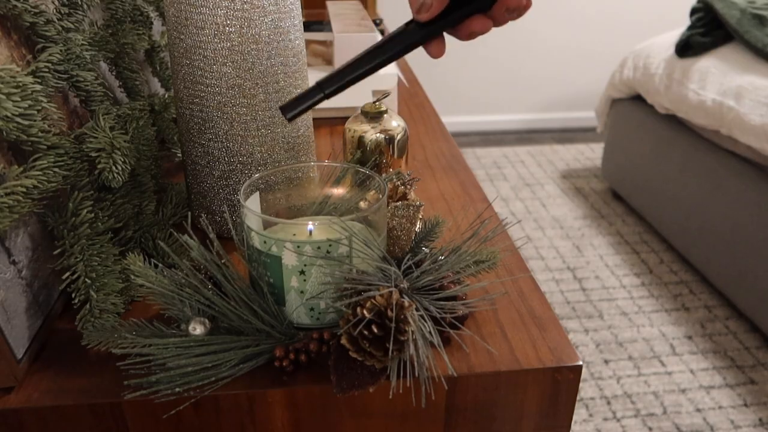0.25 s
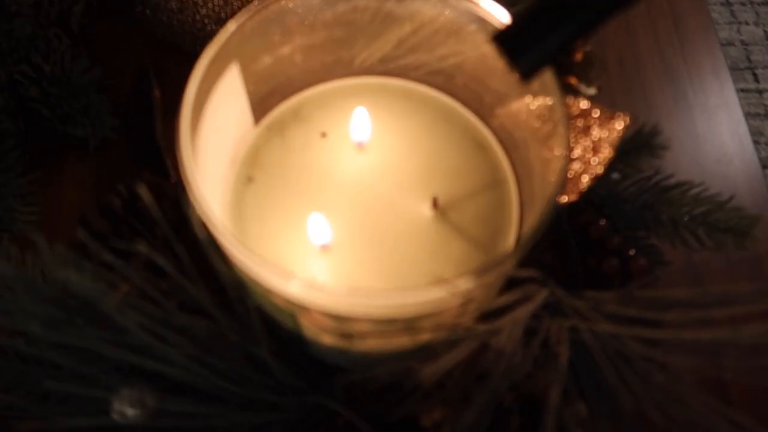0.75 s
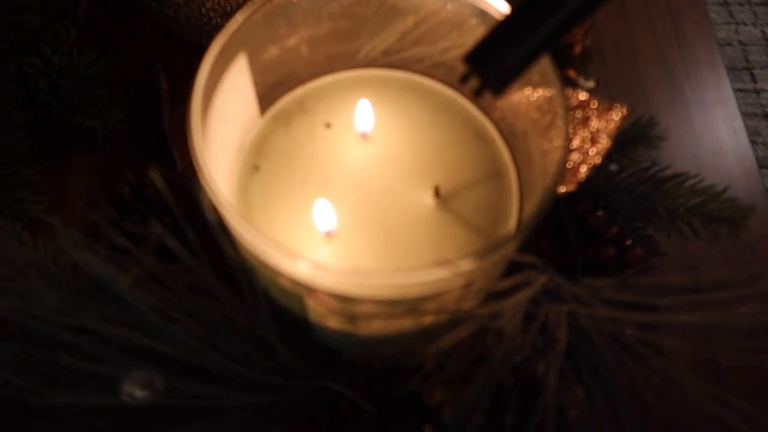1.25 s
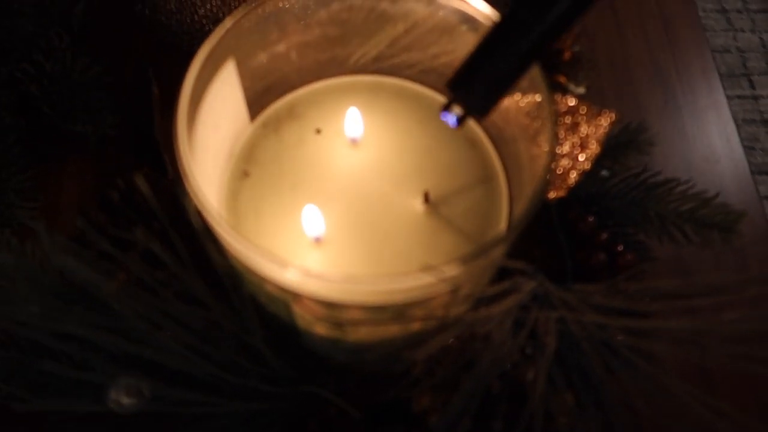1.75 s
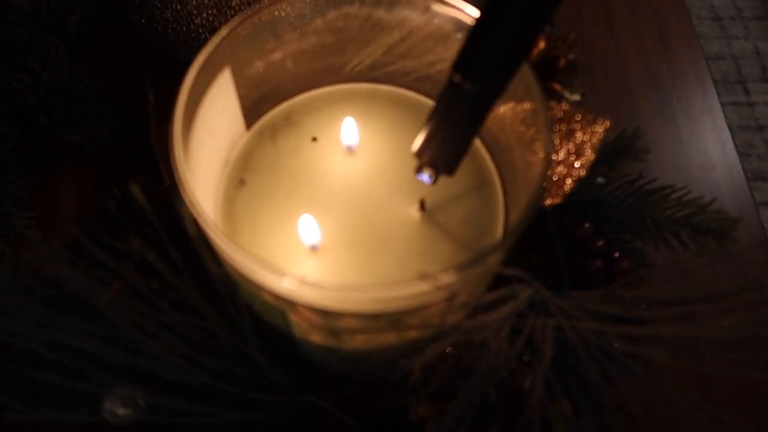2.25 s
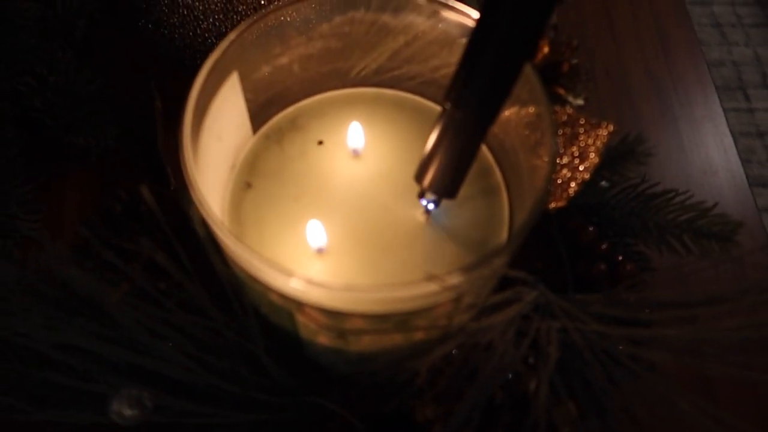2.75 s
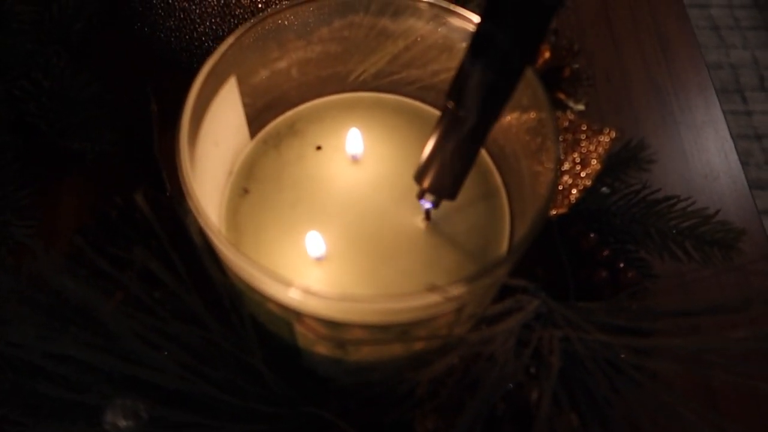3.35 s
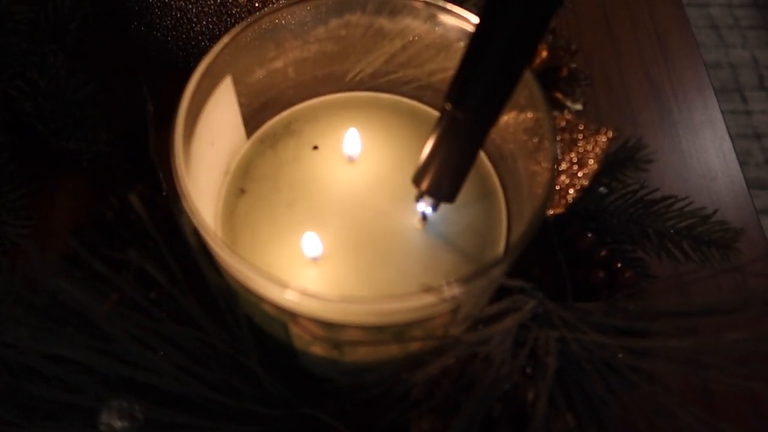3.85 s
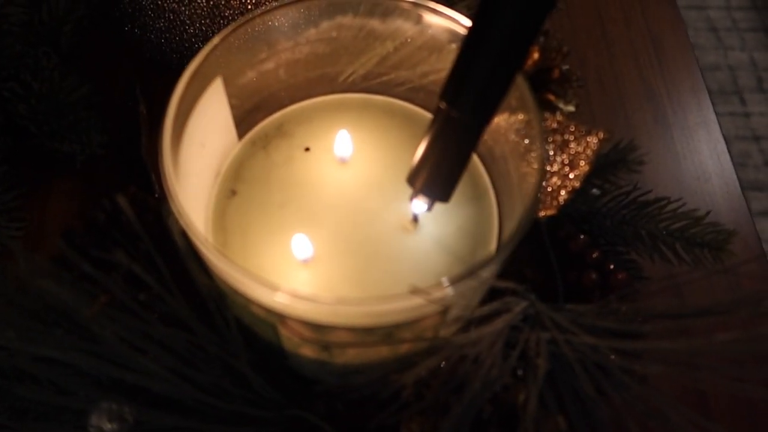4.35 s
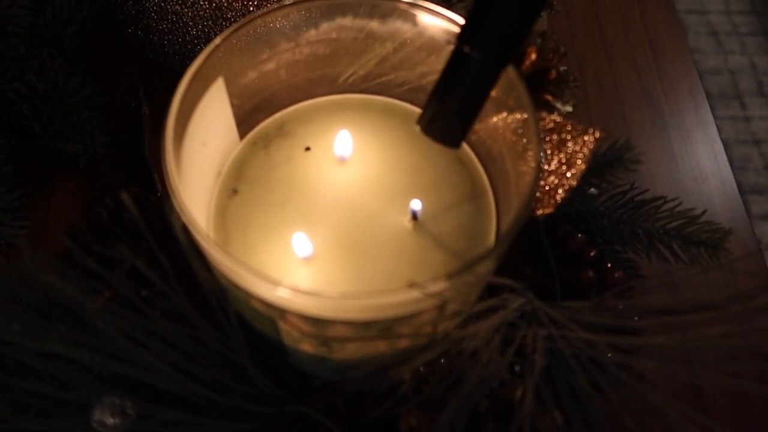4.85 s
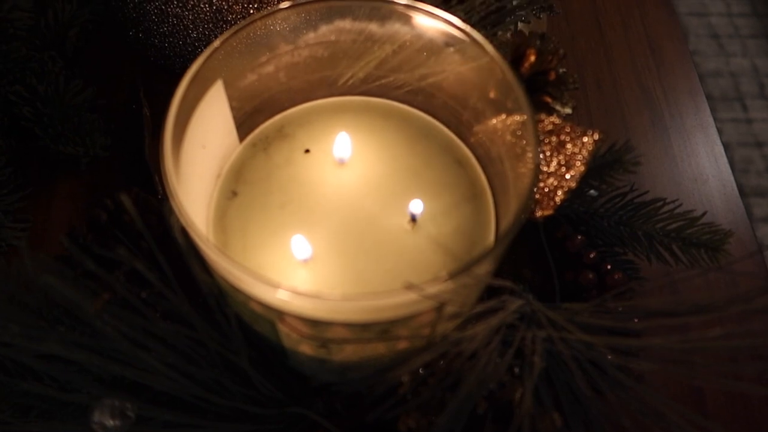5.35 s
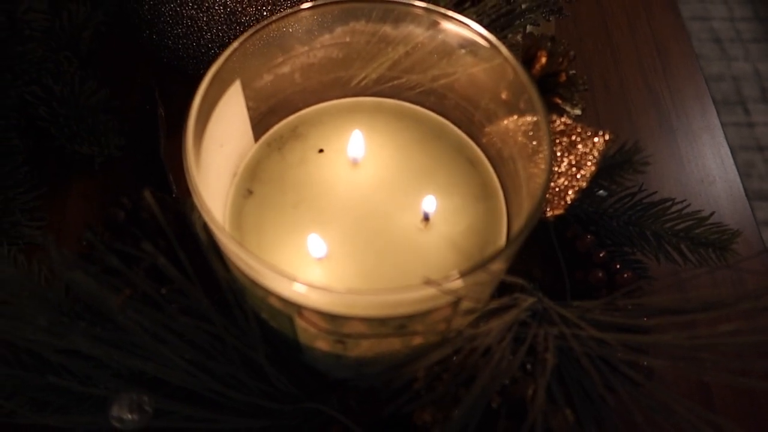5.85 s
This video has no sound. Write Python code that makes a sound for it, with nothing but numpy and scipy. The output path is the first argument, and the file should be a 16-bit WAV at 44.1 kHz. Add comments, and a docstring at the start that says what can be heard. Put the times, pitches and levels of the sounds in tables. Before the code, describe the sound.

A quiet room heard closely in stereo, with soft air noise, low rumble and a bass hum that sinks slightly in the first half second and wavers on. At about 1.0 s a loud, hard clack of a lighter's slide rings briefly, with a short dry room tail. A faint low drone, perhaps a distant aircraft, slowly falls in pitch from then on. At 1.4 s a button ticks and an electric arc begins: bright, rough, jittery hiss. At 2.0 s the wand knocks the candle jar with a solid, short glassy thud. The hiss sputters near 2.1, 2.7 and 2.8 s, its hollow colour shifting inside the jar, swells around 3.7 s and weakens from 4.0 to 4.3 s. It stops sharply at 4.6 s amid small clicks and a light finger rustle. A faint knock follows at 4.9 s, a second loud clack at 5.0 s, then hum, and tiny ticks with a slight rustle near 6.0 s.

```python
"""A quiet room at a two-port microphone: rumble, air noise and a hum through the walls (wavering partials).
A wand's slide clacks (contacts ringing modes) and a falling drone, perhaps an aircraft, joins the hum.
A button ticks and an arc lighter is lowered into a candle jar: jumping plasma noise that sputters,
combed by echoes off glass and wax, with ringing jar air; the wand knocks the jar early on.
The arc stops amid ticks and a finger rustle; a faint knock, a second clack and last ticks follow."""
import sys
import numpy as np
from scipy import signal
from scipy.fft import rfft, irfft, next_fast_len
from scipy.io import wavfile
from scipy.ndimage import uniform_filter1d, map_coordinates

SR = 44100
rng = np.random.default_rng(int(sys.argv[2]) if len(sys.argv) > 2 else 0)


def to_wav(sig):
    """Store sig (one row per channel, or 1-D mono) as 16-bit WAV at the path in sys.argv[1].

    Samples outside -1..1 are clipped; the rate is SR.
    """
    pcm = np.clip(np.atleast_2d(sig), -1, 1) * 32767
    pcm = np.round(pcm).astype(np.int16)
    wavfile.write(sys.argv[1], SR, pcm.T)  # frames by channels


N = 269010
T = np.arange(N) / SR
OPPOSITE = np.array([[1], [-1]])  # opposite sign at the two ports


def undb(db):
    """Amplitude ratio of a level in dB."""
    return 10 ** (np.asarray(db) / 20)


def curves(table):
    """Columns of a table, joined by straight lines in time."""
    time_s, *columns = np.transpose(table)
    return [np.interp(T, time_s, column) for column in columns]


def unit(x):
    """Scale to rms 1."""
    return x / np.sqrt(np.mean(x ** 2))


def noise(points):
    """Noise of rms 1, its spectrum drawn through (Hz, dB) points on a log frequency axis."""
    size = next_fast_len(N)
    hz, db = np.transpose(points)
    bin_hz = np.maximum(np.arange(size // 2 + 1), 1) * SR / size
    gain = undb(np.interp(np.log(bin_hz), np.log(hz), db))
    return unit(irfft(rfft(rng.standard_normal(size)) * gain, size)[:N])


def band(x, hz, width_hz):
    """Resonance with gain 1 at the centre."""
    b, a = signal.iirpeak(min(hz, .45 * SR), hz / width_hz, SR)
    return signal.lfilter(b, a, x)


def butter(x, order, hz, kind):
    """Butterworth filter."""
    return signal.sosfilt(signal.butter(order, hz, btype=kind, fs=SR, output="sos"), x)


def walk(rate_hz, slew):
    """Random levels, one per 1 / rate_hz, joined over the share slew of that time."""
    hold = int(SR / rate_hz)
    steps = np.repeat(rng.standard_normal(N // hold + 1), hold)
    return uniform_filter1d(steps, int(hold * slew) + 1)[:N]


def delayed(x, ms):
    """Delay by a fractional, possibly moving time."""
    return map_coordinates(x, [np.arange(N) - ms * SR / 1000], order=3)


def after(start_s, decay_s):
    """Sudden rise, exponential fall."""
    return (T >= start_s) * np.exp(-np.maximum(T - start_s, 0) / decay_s)


def swell(start_s, length_s):
    """Half-sine rise and fall."""
    return np.sin(np.pi * np.clip((T - start_s) / length_s, 0, 1))


def ports(x, lead_ms, lean_db):
    """A source to one side reaches the left port lead_ms early; lean_db makes its treble louder there."""
    lean = (undb(lean_db) - 1) * band(x, 4900, 6000)
    return np.array([delayed(x + lean, -lead_ms / 2), delayed(x - lean, lead_ms / 2)])


# rumble: (time [s], level [dB])
ROOM_LEVEL = [(0, -56), (.45, -52.5), (.71, -47), (1.7, -48), (4.4, -50), (4.75, -44.5), (5.5, -51)]
# spectra of rumble, air noise, and the air noise unlike at the ports: (frequency [Hz], relative level [dB])
RUMBLE_SPECTRUM = [(25, -69.5), (45, -12), (70, 10.5), (110, 1), (160, 1), (250, -4), (400, -11),
                   (800, -56)]
AIR_SPECTRUM = [(120, 2), (200, -19), (254, -8), (529, -10), (569, -12), (1120, -12), (1840, -15.5),
                (2090, -11), (2560, -16.5), (12800, -37), (16000, -58)]
AIR_SIDE_SPECTRUM = [(88, -30), (150, -0.5), (361, 0), (601, -6.5), (1040, -10.5), (1450, -11),
                     (2870, -20.5), (10200, -30.5), (12900, -39), (16000, -40.5)]
AIR_DB = -49.5
RUMBLE_SIDE_DB, AIR_SIDE_DB = -22, -4  # against the part alike at both ports


def room_tone():
    """Rumble nearly alike at both ports, air noise partly unlike."""
    rumble_db, = curves(ROOM_LEVEL)
    rumble = noise(RUMBLE_SPECTRUM) + undb(RUMBLE_SIDE_DB) * noise(RUMBLE_SPECTRUM) * OPPOSITE
    air = noise(AIR_SPECTRUM) + undb(AIR_SIDE_DB) * noise(AIR_SIDE_SPECTRUM) * OPPOSITE
    return undb(rumble_db) * rumble + undb(AIR_DB) * air


WAVER_DB = 1.5


def tones(pitch, gains, multiples):
    """Partials of one slowly moving pitch, each wavering a little in level."""
    phase = 2 * np.pi * np.cumsum(curves(pitch)[0]) / SR
    total = 0
    for multiple, gain in zip(multiples, gains):
        waver = undb(WAVER_DB * walk(12, 1))
        total = total + np.sqrt(2) * gain * waver * np.sin(multiple * phase)
    return total


# pitch of hum and drone: (time [s], frequency [Hz])
HUM_PITCH = [(0, 72), (.3, 69.5), (.52, 68), (.62, 64.7), (6.1, 64.1)]
DRONE_PITCH = [(1, 102), (1.5, 96), (2, 90.8), (3, 85.5), (4, 80), (4.5, 77.6), (5, 76.4), (6.1, 74)]
# partials of hum and drone: (time [s], level [dB], octave level [dB])
HUM_LEVEL = [(0, -61, -75), (.4, -41, -62), (.75, -37, -46.5), (1.2, -44.5, -48), (1.55, -36, -53.5),
             (2.05, -44, -53.5), (2.5, -48, -50.5), (2.8, -54, -56), (3.2, -48, -62), (3.55, -58, -65),
             (4, -43.5, -54), (4.5, -49, -66), (4.8, -65, -53), (5.1, -39.5, -65), (5.5, -38, -53),
             (6.1, -48, -70)]
DRONE_LEVEL = [(1, -66, -82), (1.7, -49, -68), (2.2, -49, -61), (2.7, -42, -56), (3.3, -35.5, -60.5),
               (3.85, -40.5, -53), (4.15, -45, -65), (4.5, -53.5, -49), (5.3, -54, -46.5),
               (5.6, -56, -56.5), (5.85, -67, -48), (6.1, -65, -53.5)]
# faint upper tone of the drone, sounding for a moment
WHINE_S, WHINE_LENGTH_S, WHINE_DB, WHINE_MULTIPLE = 2.05, 0.66, -56.5, 3.92


def outdoors():
    """Steady hum and falling drone with their octaves, alike at both ports."""
    whine = undb(WHINE_DB) * np.maximum(swell(WHINE_S, WHINE_LENGTH_S), 0) ** .5
    hum = tones(HUM_PITCH, undb(curves(HUM_LEVEL)), (1, 2))
    drone = tones(DRONE_PITCH, [*undb(curves(DRONE_LEVEL)), whine], (1, 2, WHINE_MULTIPLE))
    return hum + drone


TAIL_T60_S, TAIL_HZ = 0.23, 3310


def tail(x):
    """Short diffuse reflections, duller than the source, their treble unlike at the ports."""
    t = T[:SR // 3]
    mid, side = rng.standard_normal((2, len(t))) * 1000. ** (-t / TAIL_T60_S) * (t > .003)
    side = 0.093 * butter(side, 2, 1500, "high")
    decay = butter(np.array([mid + side, mid - side]), 1, TAIL_HZ, "low")
    decay = decay / np.sqrt(np.sum(decay ** 2) / 2)
    return signal.fftconvolve(x, decay, axes=1)[:, :N]


WALL_MS, WALL_PORT_MS = 44, 0.034
WALL_DB, WALL_HZ, WALL_WIDTH_HZ = -16.5, 4600, 500


def wall_echo(x):
    """One narrow-band echo, slightly later at the second port."""
    echo = [delayed(band(port, WALL_HZ, WALL_WIDTH_HZ), WALL_MS + k * WALL_PORT_MS) for k, port in enumerate(x)]
    return undb(WALL_DB) * np.array(echo)


def blows(events, modes_hz, modes):
    """A short rattle of contacts: a dry crack, and ringing modes of which the low ones build up late."""
    out, t = np.zeros(N), T[:SR // 3]
    hz = np.array(modes_hz)[:, None]
    db, t60_s = np.transpose(modes)[:, :, None]
    sign = (-1) ** np.arange(len(hz))[:, None]
    for start_s, peak_db, low_db, tilt_db, ping_db, rattle_s, crack_db, grip in events:
        colour_db = np.where(hz < 700, low_db, tilt_db * np.maximum(np.log2(hz / 1100), 0))
        ping = ping_db * np.exp(-(np.log2(hz / 4000) / 0.77) ** 2)
        gain = sign * undb(db + colour_db + ping)
        build_up = 1 - np.exp(-t * hz / 0.56)
        decay = 1000. ** (-t / (grip * t60_s))
        ring = np.sum(gain * build_up * np.sin(2 * np.pi * hz * t) * decay, axis=0)

        contacts = rng.standard_normal(len(t)) * np.exp(-t / rattle_s) * (1 - np.exp(-t / 0.00061))
        crack = band(band(contacts, 2900, 4000), 3993, 9000) + 0.38 * band(contacts, 980, 900)
        # one clean impulse, then the rattle
        sound = signal.fftconvolve(ring, 0.03 * contacts + (t == 0))[:len(t)]
        sound = sound / np.max(np.abs(sound)) + undb(crack_db) * crack / np.max(np.abs(crack))
        i = int(start_s * SR)
        out[i:i + len(t)] += undb(peak_db) * sound / np.max(np.abs(sound))
    return out


# blows on the jar: (time [s], peak before the ports [dB], low modes [dB], tilt of high modes [dB/octave],
# modes near 4 kHz [dB], rattle decay [s], crack against ring [dB], grip [share of free ring time])
JAR_KNOCKS = [(1.9686, -6, -1, -2.5, 0, 0.00049, -14.5, 0.57), (4.8625, -26.5, -3, -11, 0, 0.0034, -29, 1)]
# modes of the wax-filled jar on its table: [Hz]
JAR_MODES_HZ = [100, 250, 284, 450, 526, 720, 900, 1100, 1170, 1750, 2150, 2560, 2900, 4500, 6300]
# the same modes: (relative level [dB], free t60 [s])
JAR_MODES = [(-17, 0.15), (-3, 0.058), (-0.5, 0.052), (-12, 0.022), (-5, 0.07), (-20, 0.038), (-8, 0.046),
             (5, 0.02), (2.5, 0.032), (-18.5, 0.036), (-18, 0.036), (-14.5, 0.056), (-12, 0.02),
             (-33, 0.02), (-23, 0.1)]


def jar_knocks():
    """The wand strikes the jar and excites its modes."""
    return ports(blows(JAR_KNOCKS, JAR_MODES_HZ, JAR_MODES), 0.021, .3)


# clacks of the slide, columns as for the knocks
SLIDE_CLACKS = [(0.9717, -0.5, -4.5, -0.5, 5, 0.0057, -13.5, 0.73),
                (4.9667, -1, -5.5, -1, -11, 0.0053, -4, 0.74)]
# modes of wand and table top: [Hz]
WAND_MODES_HZ = [107, 241, 402, 524, 807, 1083, 1160, 1420, 1765, 2080, 2543, 2942, 3233, 3515, 4340, 4477,
                 4612, 5150, 6325, 6700, 7500, 8560, 9052, 11100]
# the same modes: (relative level [dB], free t60 [s])
WAND_MODES = [(-12.5, 0.098), (-2, 0.061), (-11.5, 0.049), (-4, 0.063), (-9, 0.024), (1, 0.028), (3, 0.025),
              (-16.5, 0.07), (-12.5, 0.05), (-13.5, 0.034), (-8, 0.042), (-5.5, 0.069), (-4, 0.021),
              (-3, 0.017), (-12, 0.031), (-3, 0.11), (-12, 0.071), (-12.5, 0.033), (-18.5, 0.16),
              (-14.5, 0.05), (-7, 0.045), (-18, 0.0673), (-17.5, 0.051), (-14.5, 0.064)]


def slide_clacks():
    """The slide hits its stop and excites wand and table top."""
    return ports(blows(SLIDE_CLACKS, WAND_MODES_HZ, WAND_MODES), 0.025, 0.47)


# ticks: (time [s], peak before the ports [dB], low and high resonance against the middle one,
# before scaling by frequency and decay [dB])
BUTTON_TICKS = [(1.4172, -27.5, 16, 0), (4.597, -30.5, 12, 0), (4.611, -34, -10, 12),
                (4.6667, -15, -9, -4.5), (4.715, -49, -10, 14), (5.936, -49, -10, 10), (5.958, -43, -10, 1),
                (6.0201, -31, -22, -17)]
# resonances of the button: (frequency [Hz], burst decay [s])
BUTTON_MODES = [(1130, 0.0027), (2720, 0.0027), (5700, 0.0013)]


def button_ticks():
    """Tiny noise bursts ring the button's broad resonances."""
    out = 0
    for start_s, peak_db, low_db, high_db in BUTTON_TICKS:
        snap = rng.standard_normal(N)
        burst = 0
        for (hz, decay_s), db in zip(BUTTON_MODES, (low_db, 0, high_db)):
            ring = band(band(snap * after(start_s, decay_s), hz, 0.22 * hz), hz, 0.66 * hz)
            burst = burst + undb(db) / np.sqrt(hz * decay_s) * ring
        out = out + undb(peak_db) * burst / np.max(np.abs(burst))
    return out


# fingers on the wand: (time [s], length [s], level before flicker and swell [dB], centre [Hz])
FINGER_RUSTLES = [(4.592, 0.13, -54.5, 3200), (5.938, 0.1, -56, 6000)]


def finger_rustles():
    """Sliding skin: flickering band noise that swells and fades."""
    out = 0
    for start_s, length_s, db, hz in FINGER_RUSTLES:
        flicker = undb(3.3 * walk(180, .5))
        skin = unit(band(rng.standard_normal(N), hz, 1.9 * hz))
        out = out + undb(db) * swell(start_s, length_s) * flicker * skin
    return out


def places(table):
    """Each row holds until the next travel begins, then glides there."""
    rows = [table[0][:1] + table[0][2:]]
    for old, new in zip(table, table[1:]):
        arrive_s, travel_s = new[:2]
        rows += [(arrive_s - travel_s,) + old[2:], (arrive_s,) + new[2:]]
    return curves(rows)


ARC_ON_S, ARC_OFF_S = 1.4180, 4.5975
# arc before jumps, falters and sputters: (time [s], level [dB])
ARC_LEVEL = [(1.42, -45), (1.52, -45.5), (1.85, -48.5), (1.96, -47), (2.05, -50.5), (2.16, -51),
             (2.26, -44.5), (2.36, -49), (2.44, -42.5), (2.53, -48), (2.68, -49), (2.86, -44), (3.2, -48),
             (3.3, -48.5), (3.62, -45), (3.72, -40.5), (3.82, -46.5), (3.92, -47.5), (4.03, -59),
             (4.31, -59), (4.5, -46.5), (4.59, -44.5)]
# colour as the tip sinks: (time [s], treble against the level [dB], jar air against it [dB])
ARC_TINT = [(1.42, 3.5, -11.5), (1.52, 4, -6.5), (1.68, 3, -14), (1.9, 4, -7), (2.1, 6, -10), (2.3, 7.5, 0),
            (2.5, 0.5, -5.5), (3.1, 5.5, -3.5), (3.7, -0.5, -8), (4.3, 2.5, -5.5), (4.6, 1, -8)]
# plasma spectrum: (frequency [Hz], relative level [dB])
PLASMA_SPECTRUM = [(300, -17), (800, -11), (2000, -3), (4000, 1), (7000, -3.5), (9000, -0.5), (12000, 0.5),
                   (16000, -1)]
# brief dips: (time [s], fall [dB])
ARC_FALTERS = [(2.32, 5.5), (2.809, 10), (3.24, 6), (3.86, 6.5)]
FALTER_S = .012
# sudden rises: (time [s], rise [dB], decay [s])
ARC_SPUTTERS = [(1.417, 15, 0.0052), (2.125, 7.5, 0.0038), (2.716, 11.5, 0.0033), (2.819, 9, 0.0067)]
# places of the tip: (arrival [s], travel [s], then four echoes off rim, glass and wax: delay [ms], share)
TIP_ECHOES = [(1.42, 0, .218, .93, .35, -.2, .645, .4, .775, .35),
              (2.05, .3, .16, .93, .3, .15, .535, -.25, .75, 0),
              (2.26, .2, .115, .9, .365, -.15, .62, .25, .75, 0),
              (2.4, .12, .097, .9, .415, -.25, .47, .4, .8, .05),
              (2.54, .07, .13, .35, .35, -.3, .485, .3, .828, .4),
              (2.83, .07, .278, .3, .375, -.15, .548, -.22, .813, .5),
              (3.4, .1, .193, -.35, .382, -.33, .572, -.36, .81, .1),
              (4.35, .2, .3, .25, .392, -.3, .576, -.36, .81, 0)]
PORT_MS = .01  # echo lag between the ports
# air modes of the jar: (frequency [Hz], width [Hz], level before scaling by width [dB])
JAR_AIR_MODES = [(1166, 99, 11), (2600, 130, -4), (4396, 200, 3.5), (6305, 280, 1.5), (7130, 800, -0.5),
                 (9700, 110, -19)]
CROSS_HZ, CROSS_WIDTH_HZ, CROSS_DB = 1400, 58, 6.5  # crosswise air mode
SCATTER_HZ, SCATTER_DB = 10900, -0.5


def arc_level_db():
    """The level jumps as the plasma channel wanders, falters and sputters."""
    db, = curves(ARC_LEVEL)
    db = db + 1.68 * walk(45, 0.084)
    for time_s, fall_db in ARC_FALTERS:
        db = db - fall_db * np.exp(-((T - time_s) / FALTER_S) ** 2)
    for time_s, rise_db, decay_s in ARC_SPUTTERS:
        db = db + rise_db * after(time_s, decay_s)
    return db


def arc():
    """Plasma noise combed by echoes of the moving tip, exciting the jar's air modes."""
    treble_db, jar_db = curves(ARC_TINT)
    plasma = noise(PLASMA_SPECTRUM)
    low = butter(plasma, 2, 9200, "low")
    burning = (T >= ARC_ON_S) & (T < ARC_OFF_S)
    hiss = (low + undb(treble_db) * (plasma - low)) * undb(arc_level_db()) * burning

    paths = places(TIP_ECHOES)
    delays_ms, shares = paths[::2], paths[1::2]
    # the level is that of direct sound and echoes together
    hiss = 1.073 * hiss / np.sqrt(1 + sum(share ** 2 for share in shares))

    jar = sum(undb(db) * band(hiss, hz, width_hz) * np.sqrt(4000 / width_hz) for hz, width_hz, db in JAR_AIR_MODES)
    direct = hiss + undb(jar_db) * jar
    # echoes arrive from the side, so one port hears them later
    both = np.array([direct + sum(share * delayed(hiss, ms + side * PORT_MS) for ms, share in zip(delays_ms, shares))
                     for side in (-.5, .5)])

    # the shortest waves scatter round the jar; they and the crosswise mode differ between the ports
    scatter = butter(delayed(hiss, 1.7), 6, SCATTER_HZ, "high")
    cross = band(hiss, CROSS_HZ, CROSS_WIDTH_HZ)
    return both + (undb(SCATTER_DB) * scatter + undb(CROSS_DB) * cross) * OPPOSITE


HAND_TAIL_DB, TICK_TAIL_DB, ARC_TAIL_DB = -14, -19, -24  # tail against its source


def scene():
    """Sum of background, handling, arc and their reflections."""
    clack = slide_clacks() + jar_knocks()
    tick = ports(button_ticks() + finger_rustles(), -0.026, .1)
    hiss = arc()
    room = tail(undb(HAND_TAIL_DB) * clack + undb(TICK_TAIL_DB) * tick + undb(ARC_TAIL_DB) * hiss)
    return room_tone() + outdoors() + room + wall_echo(clack) + clack + tick + hiss


BASS_HZ, TOP_HZ = 44, 15900


def record(dry):
    """The microphone loses the deepest bass; the recorder cuts the top."""
    thin = butter(dry, 2, BASS_HZ, "high")
    return signal.sosfilt(signal.ellip(8, .2, 70, TOP_HZ, fs=SR, output="sos"), thin)


dry = scene()
out = record(dry)
to_wav(out)
```